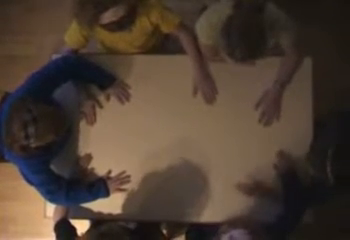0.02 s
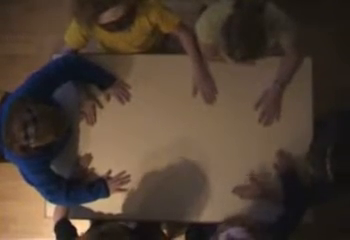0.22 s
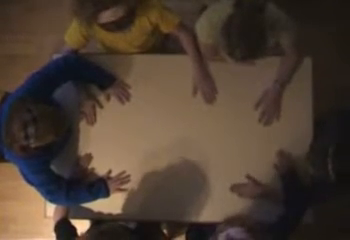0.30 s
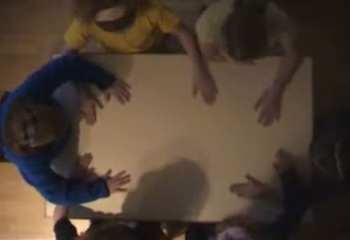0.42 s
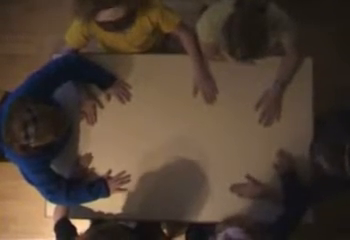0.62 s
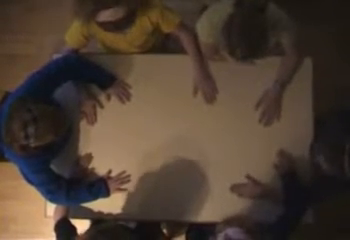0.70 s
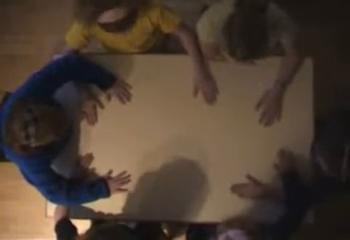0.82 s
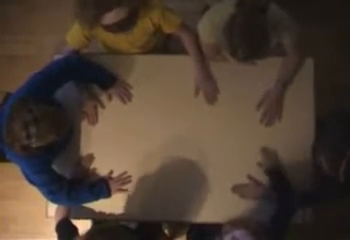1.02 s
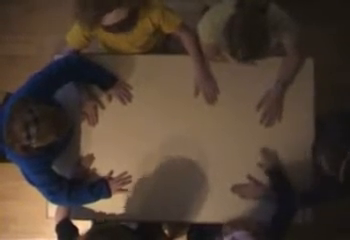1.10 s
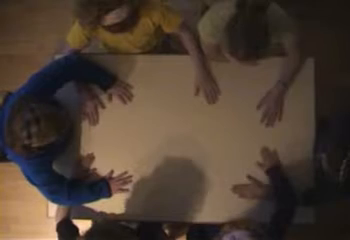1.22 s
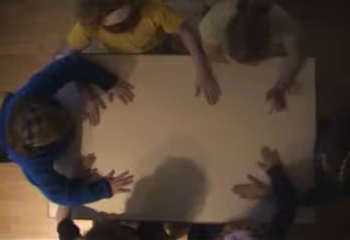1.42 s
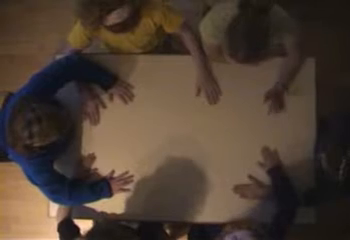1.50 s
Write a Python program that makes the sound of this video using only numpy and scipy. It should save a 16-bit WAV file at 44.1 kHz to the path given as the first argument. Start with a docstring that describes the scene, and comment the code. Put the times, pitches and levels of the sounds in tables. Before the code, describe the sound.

Flat hands slap a wooden table in a bare, lively room. A deep, dull palm thump lands at about 0.2 seconds, a sharper, hollow, cupped smack at 0.44, and after a pause a strong flat slap at 1.17. Each makes a puff of air, skin crack and short woody ring, with fluttering echoes and a room tail. Faint hiss and fading low room noise lie beneath.

```python
"""Three flat hands slap a wooden table in a bare, lively room.
Each hand squeezes out a puff of air (a squared-off, decaying sine), its fingers and skin crack
on the wood (filtered noise bursts) and the table top rings (dying sines).
Discrete echoes flutter between table and ceiling; a noise tail and standing waves die away.
Under it lie a faint steady hiss and a low noise already fading in the room."""
import sys
import numpy as np
from scipy import signal
from scipy.fft import rfft, irfft
from scipy.io import wavfile
from scipy.ndimage import uniform_filter1d

SR = 44100
rng = np.random.default_rng(int(sys.argv[2]) if len(sys.argv) > 2 else 0)


def persist_wave(psi):
    """Save psi, clipped to +-1, as 16-bit WAV."""
    counts = np.round(np.clip(psi, -1, 1) * 32767).astype(np.int16)
    wavfile.write(sys.argv[1], SR, np.atleast_2d(counts).T)


N = 68355
HZ, T = np.fft.rfftfreq(2 * N, 1 / SR), np.arange(N) / SR

# Likeness of left and right in the room. Each row: frequency in Hz, likeness 0-1.
ROOM_LIKENESS = [(100, .998), (500, .99), (1200, 0.95), (2500, 0.92), (5000, 0.87), (9000, 0.68),
                 (14000, 0.56)]

HISS_DB, HISS_RIGHT_DB, HISS_EDGE_HZ = -54, 1.1, 12400
LINGER_DB, LINGER_FALL_DB_PER_S = -50, 46
PUFF_RISE_CYCLES, PUFF_DECAY_CYCLES, PUFF_STEEPNESS = 0.26, 0.16, 2.26
CRACK_RISE_S, CRACK_DECAY_S, FINGERS_S = 0.0006, 0.001, 0.0036
# The walls close in after WALLS_S; scatter before that has only NEAR_SHARE of the amplitude.
WALLS_S, WALLS_RISE_S, NEAR_SHARE = 0.0103, 0.003, 0.7
EARLY_DB, EARLY_S = 3.5, 0.0057  # boost of the first scatter, and how fast its dB fade
RIPPLE_DB, RIPPLE_SPACING_HZ = 2.5, 44.9
MODE_RISE_S = 0.028
MIC_RIGHT_DB, PEAK_LIMIT = 1, 0.71
LOW_CUT_HZ, HIGH_CUT_HZ = 55, 14400


def amp(db):
    """Decibels to gain."""
    return 10 ** (np.asarray(db) / 20)


def right_louder(db):
    """Left and right gains that put the right db above the left."""
    return amp([[-db / 2], [db / 2]])


def evened(x):
    """Scales to an rms of one."""
    return x / np.sqrt(np.mean(x ** 2) + 1e-20)


def read(points, hz):
    """Interpolates a table on a log-frequency axis."""
    f, value = np.transpose(points)
    return np.interp(np.log(hz + 1), np.log(f), value)


def add(mix, start_s, sound):
    """Adds a sound into the mix from start_s on."""
    part = mix[:, max(round(start_s * SR), 0):]
    part += sound[..., :part.shape[1]]


def colour(x, db):
    """Causal minimum-phase filter with this gain curve, scaled to unit power."""
    cepstrum = irfft(np.log(evened(amp(db))))
    response = np.exp(rfft(2 * cepstrum[:N], 2 * N) - cepstrum[0])
    return irfft(rfft(x, 2 * N) * response)[..., :N]


def pair(likeness):
    """White noise at two close microphones: a shared part plus an opposed part."""
    a, b = rfft(rng.standard_normal((2, 2 * N)))
    c = np.clip(read(likeness, HZ), 0, 0.9995)
    mid = a * np.sqrt((1 + c) / 2)
    side = b * np.sqrt((1 - c) / 2)
    return irfft([mid + side, mid - side])[:, :N]


def flatten(x, size):
    """Evens out the broad humps in a noise burst's spectrum over size bins, keeping its energy."""
    z = rfft(x, 2 * N)
    power = uniform_filter1d((abs(z) ** 2).mean(0), size) + 1e-12
    return irfft(z * np.sqrt(power.mean() / power))[:, :N]


def ring(modes, weights):
    """Dying sines, each with its own weight, first swinging negative."""
    total = 0
    for (hz, db, t60_s), weight in zip(modes, weights):
        total = total + weight * amp(db - 60 * T / t60_s) * np.sin(2 * np.pi * hz * T)
    return -total


def background():
    """Steady hiss with a few narrow bands, and low coloured noise fading in the room."""
    # Hiss spectrum. Each row: frequency in Hz, relative density in dB per Hz.
    hiss_tone = [(25, -9), (70, -25), (130, -10), (340, -8), (700, -16.5), (1300, -16.5), (2300, -21.5),
                 (5900, -22.5), (7200, -21.5), (8200, -16), (10000, -20.5), (11000, -22), (12300, -26.5)]
    # Narrow bands in the hiss. Each row: centre in Hz, width in Hz, boost in dB.
    hiss_bands = [(2930, 60, 11), (4520, 140, 7), (6150, 27, 16), (7530, 100, 8), (8630, 340, 4.5),
                  (9500, 130, 10), (9980, 120, 4.5)]
    # Likeness of left and right hiss. Each row: frequency in Hz, likeness 0-1.
    hiss_likeness = [(100, 0.7), (1000, 0.84), (4000, 0.7), (10000, 0.52)]
    # Lingering noise spectrum. Each row: frequency in Hz, relative density in dB per Hz.
    linger_tone = [(40, -4.5), (90, -5), (160, -8), (300, -17.5), (900, -15.5), (2500, -28), (8000, -45)]

    bands_db = sum(db * np.exp(-((HZ - hz) / width_hz) ** 2) for hz, width_hz, db in hiss_bands)
    edge_db = np.clip((HZ - HISS_EDGE_HZ) / 20, 0, 50)
    hiss = evened(colour(pair(hiss_likeness), read(hiss_tone, HZ) + bands_db - edge_db))
    linger = colour(pair(ROOM_LIKENESS), read(linger_tone, HZ))
    fade = amp(LINGER_DB - LINGER_FALL_DB_PER_S * T)
    return amp(HISS_DB) * hiss * right_louder(HISS_RIGHT_DB) + linger * fade


def puff(at_s, hz):
    """Pressure builds under the falling hand, flips to suction at contact and swings back."""
    cycles = (T - at_s) * hz
    rise = np.minimum(cycles, 0) / PUFF_RISE_CYCLES
    decay = np.maximum(cycles, 0) / PUFF_DECAY_CYCLES
    wave = -np.tanh(PUFF_STEEPNESS * np.sin(2 * np.pi * cycles))
    return wave * np.exp(rise - decay) * (cycles > -0.5) * 2


def crack(at_s, db, lead_s, fingers_db, skin_tone):
    """Finger noise starts lead_s early and swells to contact, where the palm's skin cracks on the wood."""
    t = T - at_s
    palm = np.exp(-np.maximum(t, 0) / CRACK_DECAY_S + np.minimum(t, 0) / CRACK_RISE_S)
    fingers = (t > -lead_s) * np.exp(-abs(t) / FINGERS_S)
    burst = pair(ROOM_LIKENESS) * (amp(db) * palm + amp(fingers_db) * fingers)
    return colour(flatten(burst, size=4000), read(skin_tone, HZ))


def table(drive_hz, width):
    """The top is pushed down and rings, most of all near the pitch that the hand drives."""
    # Table-top modes. Each row: frequency in Hz, relative level in dB, t60 in seconds.
    table_modes = [(126.4, 3, 0.096), (164.3, -3.5, 0.24), (188, -8.5, .2), (254.2, -8.5, .25),
                   (291.4, -10, 0.32), (337, -2, 0.15), (433, -1.5, 0.087), (514.5, 0.5, 0.086),
                   (542, -4.5, 0.065), (667, -2, 0.093), (875, -5, 0.17), (1158, -6, 0.33),
                   (1246, -11, 0.44), (1355, -2, 0.35)]
    ratio = np.array(table_modes)[:, 0] / drive_hz
    return ring(table_modes, 1 / np.hypot(1, (ratio - 1 / ratio) / width))


def room(tone):
    """Scatter from nearby bodies, then dense wall echoes, each band dying at its own speed."""
    # Room decay. Each row: frequency in Hz, t60 in seconds.
    room_t60 = [(70, 1), (200, 0.63), (500, 0.59), (1000, 0.75), (2500, 0.74), (5000, 0.92), (9000, 0.49),
                (12500, 0.47), (14200, 0.54)]
    hz, t, z = signal.stft(pair(ROOM_LIKENESS), SR, nperseg=256)
    decay = amp(-60 * t / read(room_t60, hz)[:, None])
    tail = signal.istft(z * decay, SR, nperseg=256)[1][:, :N]

    walls = np.clip((T - WALLS_S) / WALLS_RISE_S, 0, 1)
    density = NEAR_SHARE + (1 - NEAR_SHARE) * walls
    early = amp(EARLY_DB * np.exp(-np.maximum(T - WALLS_S, 0) / EARLY_S))

    # Each slap's tail gets its own random uneven ripple across pitch, gentler in the bass.
    bumps = rng.standard_normal(size=2000)
    ripple = np.interp(HZ / RIPPLE_SPACING_HZ, np.arange(len(bumps)), bumps)
    ripple_db = RIPPLE_DB * ripple * HZ / (HZ + 800)
    return colour(flatten(tail, size=200) * density * early, read(tone, HZ) + ripple_db)


def standing_waves(tone):
    """The room's strongest modes, weighted by the hand's spectrum, build up and hang on."""
    # Room modes. Each row: frequency in Hz, relative level in dB, t60 in seconds.
    room_modes = [(70.4, -14, 0.48), (82.8, -11.5, 0.92), (133.06, -11.5, 0.8), (173.5, -12.5, 0.67),
                  (224.4, -8, 0.51), (240.5, -16.5, 0.84), (300, -18, 0.32), (336, -18.5, 0.86),
                  (385.6, -7, 0.47), (495, -12, 0.61), (721.6, -5, 0.5), (741, -13, 0.7), (921, -3.5, 0.43),
                  (1052, -11.5, 0.56)]
    weights = amp(read(tone, np.array(room_modes)[:, 0]))
    return ring(room_modes, weights) * (1 - np.exp(-T / MODE_RISE_S))


def slaps():
    """Each slap is puff, crack and table ring, with flutter echoes and a room tail."""
    # Slaps. Each row: contact in seconds, puff level in dB, puff pitch in Hz, crack level in dB,
    # crack louder on the right in dB, finger lead in seconds, finger level in dB, table ring level
    # in dB, most driven pitch in Hz, drive width as a ratio, room level in dB, standing waves in dB.
    slap_rows = [(.2150, -10.5, 131, -11, -0.5, 0.0037, -19, -9.5, 131, 1.3, -18.5, -13),
                 (.4396, -10, 297, -3, 0, .0021, -36, -17.5, 392, 4.7, -14.5, -12),
                 (1.1697, -5.5, 306, -6, -0.5, 0.0013, -31, -15.5, 390, 1.42, -18, -17)]
    # Skin crack spectra, one table per slap. Each row: frequency in Hz, relative density in dB per Hz.
    skin_tones = [
        [(300, -0.5), (1350, 5), (1900, -9), (2800, 1), (4200, 4), (5600, -18), (8200, -6), (9800, -19),
         (14000, -20)],
        [(300, -3), (1100, 7.5), (2000, -4), (3000, 6.5), (4000, 2), (5000, 9.5), (6500, -11.5), (14000, -12)],
        [(300, 13.5), (1400, -24), (2400, 7), (4000, -7), (5000, 5.5), (6500, -17), (8800, 4), (10200, -15.5),
         (14000, -9)],
    ]
    # What each hand sends into the room. Each row: frequency in Hz, relative density in dB per Hz.
    heavy_palm = [(35, -16), (55, 0), (80, -1.5), (170, 0), (300, -1.5), (560, -10.5), (950, -9.5),
                  (1700, -15), (2250, -11.5), (2900, -22.5), (5600, -23.5), (7500, -28), (14000, -34)]
    cupped_palm = [(35, -9), (55, -8), (80, -8.5), (200, -9.5), (450, -3.5), (800, -2), (1200, -2),
                   (1900, -15), (3600, -24.5), (5200, -23), (6800, -31.5), (10000, -33), (14000, -42)]
    flat_palm = [(35, -18), (55, -5.5), (100, -11.5), (180, -3), (320, 2), (560, -3.5), (850, -2),
                 (1400, -5), (2200, -9), (3300, -25), (5000, -24), (8600, -24.5), (14000, -34.5)]
    # Ceiling, table and wall echoes. Each row: delay in seconds, puff gain in dB, crack gain in dB.
    echoes = [(.0049, -10.5, -34), (0.013, -14.5, -11), (.0140, -26, -15.5), (.0153, -24.5, -12),
              (.0240, -13, -21), (0.0376, -25, -21)]

    out = np.zeros((2, N))
    for row, skin_tone, tone in zip(slap_rows, skin_tones, (heavy_palm, cupped_palm, flat_palm)):
        at_s, puff_db, puff_hz, crack_db, right_db, lead_s, fingers_db = row[:7]
        ring_db, drive_hz, width, room_db, standing_db = row[7:]
        air = amp(puff_db) * puff(at_s, puff_hz)
        skin = crack(at_s, crack_db, lead_s, fingers_db, skin_tone) * right_louder(right_db)
        out += air + skin
        for delay_s, air_db, skin_db in echoes:
            add(out, delay_s, amp(air_db) * air + amp(skin_db) * skin)
        add(out, at_s, amp(ring_db) * table(drive_hz, width))
        add(out, at_s, amp(room_db) * room(tone) + amp(standing_db) * standing_waves(tone))
    return out


def scene():
    """Slaps over the quiet room."""
    return slaps() + background()


def record(dry):
    """The right is raised, peaks are rounded off, deep bass is dropped and the treble is cut."""
    heard = dry * right_louder(MIC_RIGHT_DB)
    rounded = heard / (1 + (heard / PEAK_LIMIT) ** 6) ** (1 / 6)
    high_pass = signal.butter(2, LOW_CUT_HZ, "high", fs=SR, output="sos")
    thin = signal.sosfilt(high_pass, rounded)
    low_pass = signal.firwin(511, HIGH_CUT_HZ, window=("kaiser", 9), fs=SR)
    return signal.oaconvolve(thin, low_pass[None], "same")


dry = scene()
out = record(dry)
persist_wave(out)
```